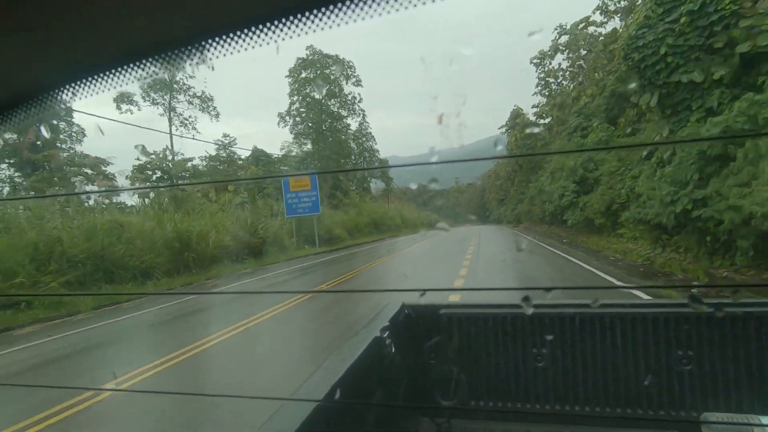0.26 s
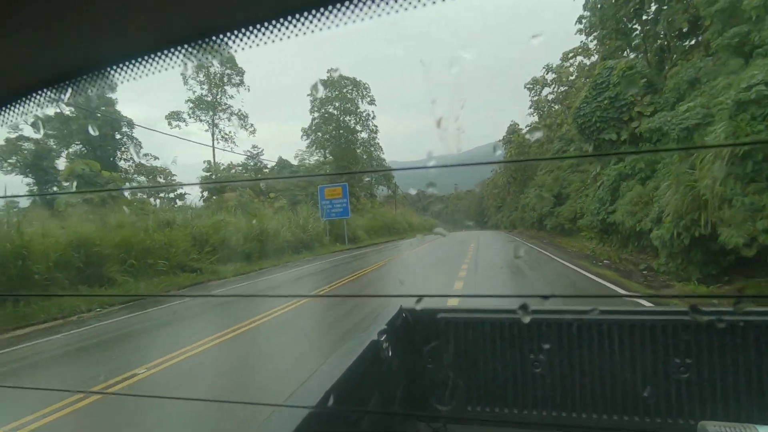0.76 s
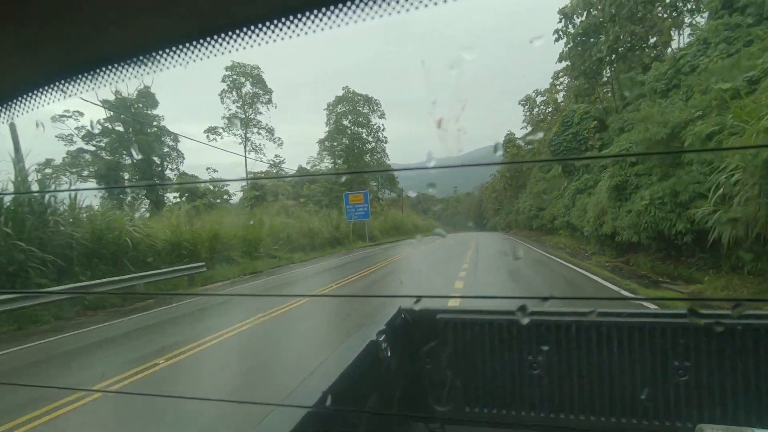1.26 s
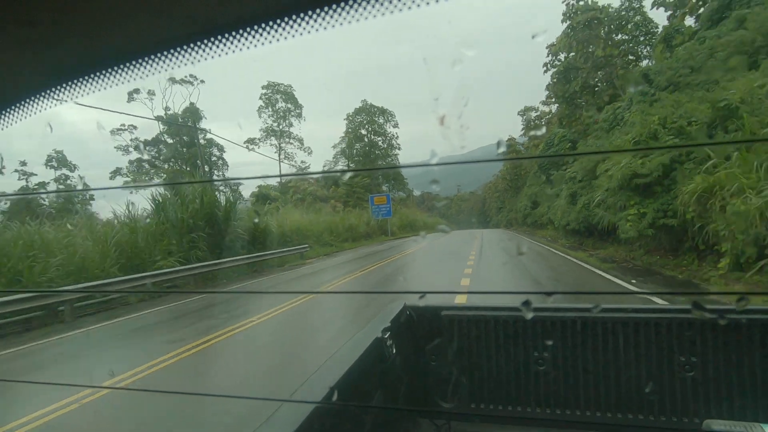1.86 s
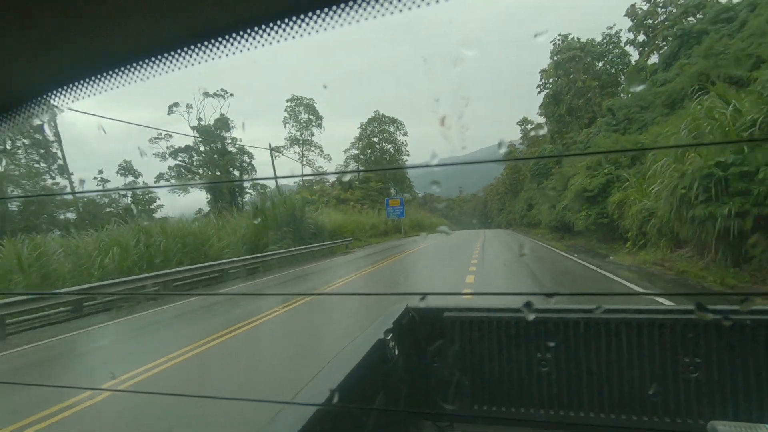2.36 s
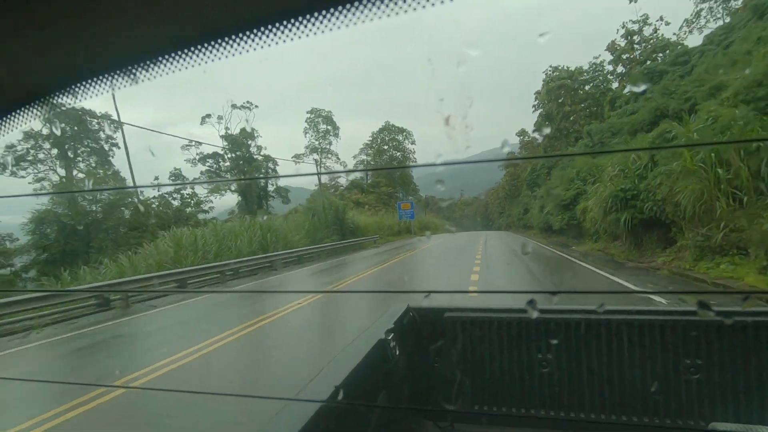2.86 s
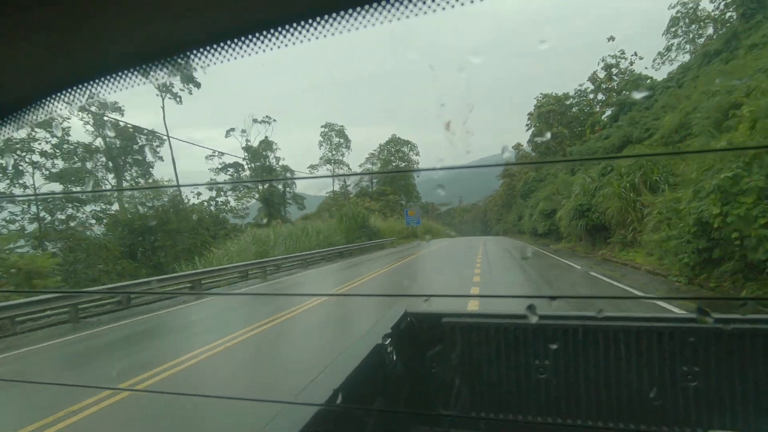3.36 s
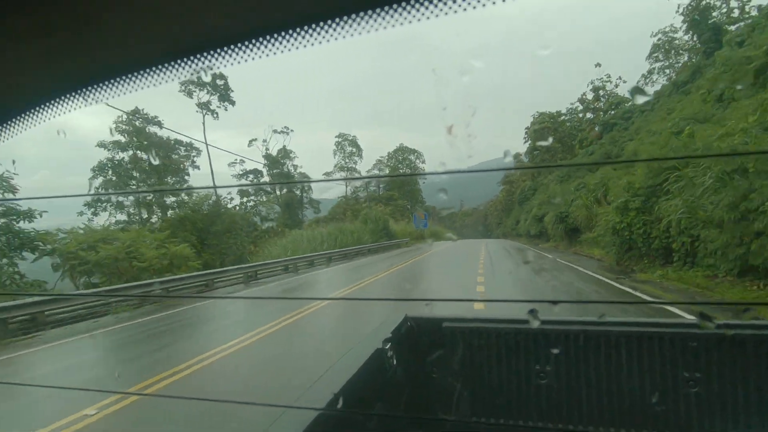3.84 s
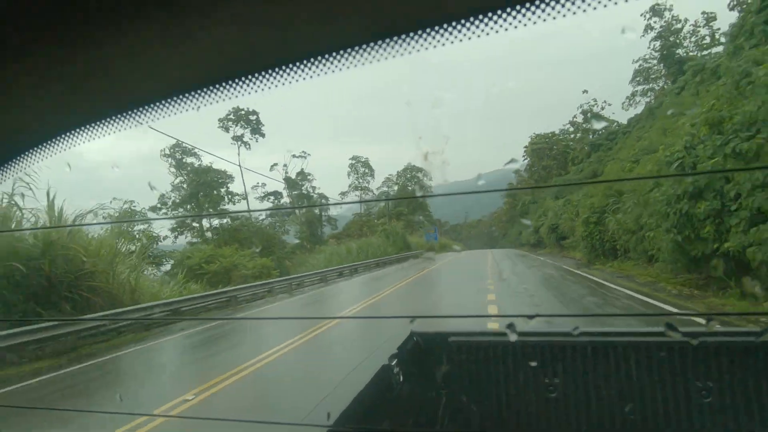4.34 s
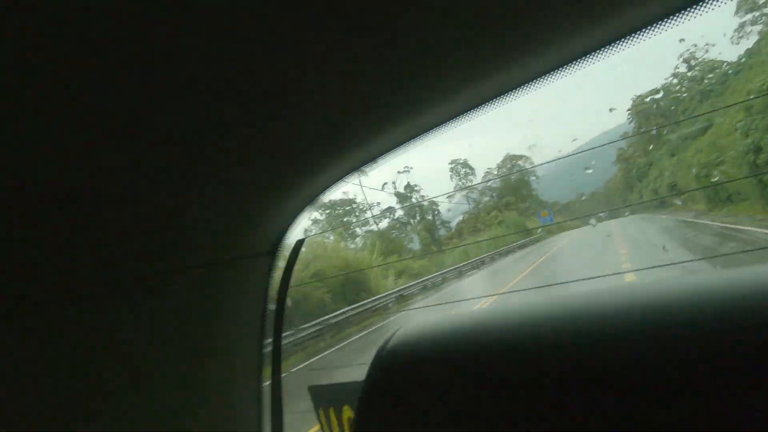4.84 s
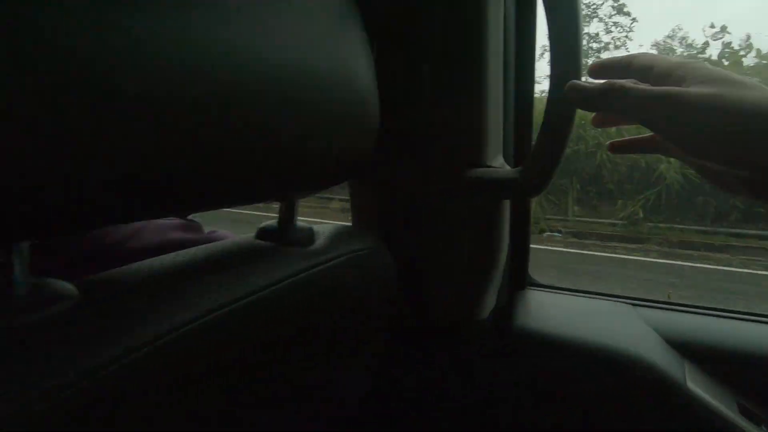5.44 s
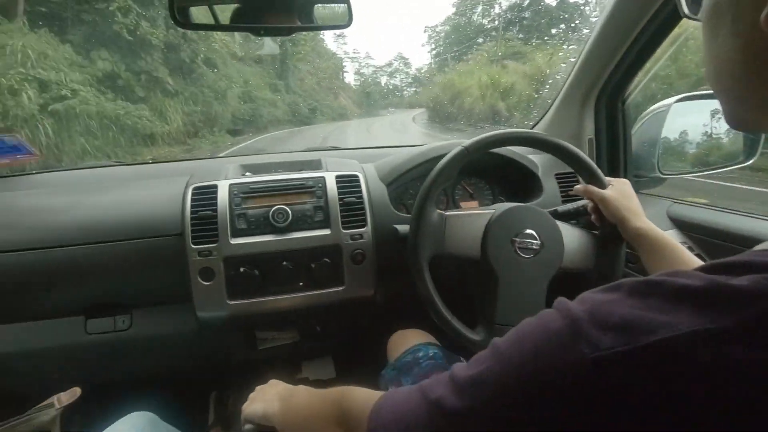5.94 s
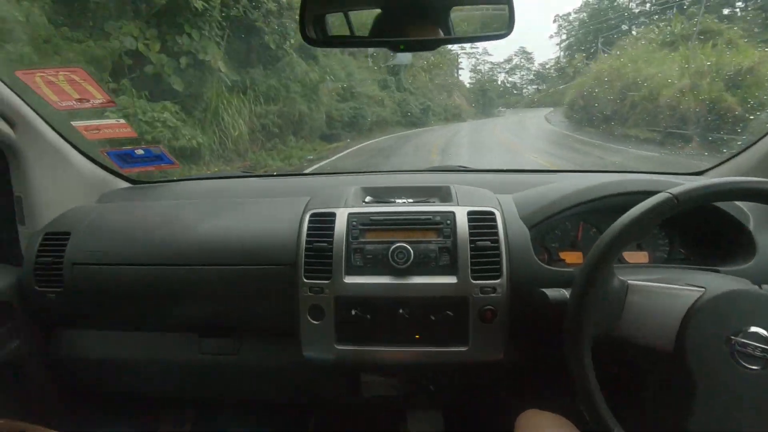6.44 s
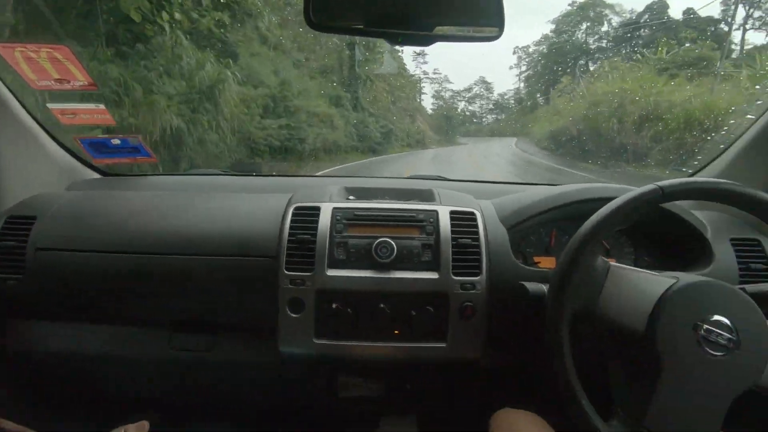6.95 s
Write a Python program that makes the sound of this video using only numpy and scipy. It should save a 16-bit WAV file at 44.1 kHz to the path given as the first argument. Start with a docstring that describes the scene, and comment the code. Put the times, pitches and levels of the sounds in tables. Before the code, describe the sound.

The close interior of a diesel pickup cruising at steady speed on a wet road, recorded from the back seat with handheld stereo microphones. A continuous deep rumble and lumpy engine-and-tyre drone dominate, with muffled clatter and a soft high wash of water. The image starts nearly mono and widens by 1.3 s as a tread hum rises slightly in pitch. Light bumps and ticks occur around 1.5 s with a very faint falling squeak, and again at 2.2 s. Two strong finger knocks land at 2.85 and 2.9 s, another with a tick at 3.5 s; the drone dips and the image narrows, then the drone returns by 4 s. From 5 to 5.5 s the holder turns forward: cloth rustles continue to 6.4 s, the drone becomes deeper and the spray slightly brighter. The image widens again; a finger rub at 6.7 s leads to knocks at 6.8 and a thud at 6.95 s. The driving noise continues to the end at about 7.2 s.

```python
"""In the cab of a pickup cruising on a wet road, heard from the back seat through two hand-held microphones.
Band-shaped noise gives the rumble, drone, roar, wash and spray of road and tyres; a wavering tone, the tread hum.
The four-cylinder diesel is a harmonic series on its cycle rate, with bursts of noise for the combustion clatter.
Near 5 s the holder turns from the rear window to the front. Clothes rustle in clumps of snaps, small parts
tick and squeak, and fingers knock on the casing, ringing its damped modes."""
import sys
import numpy as np
from scipy import signal
from scipy.fft import rfft, irfft
from scipy.io import wavfile
from scipy.ndimage import uniform_filter1d

SR = 44100
rng = np.random.default_rng(int(sys.argv[2]) if len(sys.argv) > 2 else 0)


def master_out(mix):
    """Clip the mix to full scale and print it as 16-bit PCM to the path in sys.argv[1]."""
    frames = np.transpose(np.atleast_2d(mix))
    ceiling = np.clip(frames, -1, 1)
    pcm = np.round(ceiling * 32767).astype(np.int16)
    wavfile.write(sys.argv[1], SR, pcm)


N = 317520
TIME = np.arange(N) / SR
BINS = np.maximum(np.arange(N // 2 + 1) * SR / N, 1)   # f/Hz


def from_db(db):
    """Amplitude ratio: 20 dB is a factor of ten."""
    return 10 ** (np.asarray(db) / 20)


def rms_one(x):
    """Normalisation to unit root-mean-square amplitude."""
    return x / np.sqrt(np.mean(x ** 2) + 1e-20)


def in_time(rows):
    """Linear interpolation of each column of a table over time."""
    s, *columns = np.transpose(rows)
    return [np.interp(TIME, s, c) for c in columns]


def per_bin(points, beyond=None):
    """Interpolation of a table over log frequency, at every bin."""
    hz, value = np.transpose(points)
    return np.interp(np.log(BINS), np.log(hz), value, left=beyond, right=beyond)


def coloured(x, spectrum):
    """Spectral shaping: x is filtered in the frequency domain, then set to rms 1."""
    gain = from_db(per_bin(spectrum, beyond=-np.inf))
    return rms_one(irfft(rfft(x) * gain, N))


def drift(rate):
    """Slow random modulation: joined random knots, 2 * rate of them per second, with rms 1."""
    knots = rng.standard_normal(N // 100)
    position = TIME * 2 * rate + rng.random()
    return rms_one(np.interp(position, np.arange(len(knots)), knots))


def grains(per_s, spread_db):
    """Shot noise: clicks of random sign and uneven size at random instants."""
    sizes = from_db(spread_db * np.minimum(rng.exponential(1, N), 4)) * rng.choice([-1, 1], N)
    return rms_one(sizes * (rng.random(N) < per_s / SR))


def ring(clicks, hz, t60):
    """Damped resonance: a unit click starts a decaying sine, 60 dB down after t60 seconds."""
    r = from_db(-60 / (t60 * SR))
    w = 2 * np.pi * hz / SR
    return signal.lfilter([0, np.sin(w)], [1, -2 * r * np.cos(w), r * r], clicks + 1e-18)


def diffuse(spectrum, grain=0):
    """Diffuse field: two incoherent noises, one common to both ears and one that differs."""
    droplets = [grains(per_s=900, spread_db=4.0) for _ in range(2)]
    return np.array([coloured(rng.standard_normal(N) + grain * drops, spectrum) for drops in droplets])


def evened(x):
    """Automatic levelling: division by the running rms over 0.2 s."""
    return x / np.sqrt(uniform_filter1d(x ** 2, size=SR // 5, axis=1))


TURN_START_S, TURN_LENGTH_S = 4.96, 0.52


def facing():
    """Orientation of the holder: 0 toward the rear window, 1 toward the front."""
    return np.clip((TIME - TURN_START_S) / TURN_LENGTH_S, 0, 1)


# opening of the stereo image: t/s, width (0 mono, 1 full)
IMAGE_WIDTH = [(.35, 0.003), (1.3, 0.86), (2.9, 0.96), (3.75, 0.0076), (5.9, 0), (6.4, 0.6), (6.8, 0.97),
               (7.2, 0.67)]


def image_width():
    """Stereo width: the scale of the difference between the ears."""
    return np.clip(in_time(IMAGE_WIDTH)[0], 0, 1.2)


# unevenness of the road, before trims: t/s, sway of the body level/dB, boom of the cab level/dB
BUMPS = [(0, -28.5, -39), (0.5, -38, -19.5), (1.2, -26, -27), (1.7, -24, -23), (3.0, -27.5, -20),
         (3.3, -31, -31), (3.75, -35, -30), (4.45, -20.5, -21.5), (5.35, -28, -23), (5.7, -21.5, -26),
         (6.35, -25.5, -29.5), (6.9, -25, -28), (7.2, -40, -36.5)]
# drone of tread and engine, before the gains for facing: t/s, level/dB
DRONE_LEVEL = [(0, -23.5), (1.45, -23.5), (1.8, -26), (2.05, -24), (2.5, -26), (2.8, -24), (3.17, -34),
               (3.36, -29.5), (3.68, -33.5), (3.82, -30.5), (4.02, -25), (4.65, -26), (5.0, -31),
               (5.5, -31), (5.95, -30.5), (6.15, -27), (6.4, -28), (6.92, -25.5), (7.1, -32), (7.2, -30)]
# relative spectrum of the rumble through the body: f/Hz, density level/dB per Hz
RUMBLE_SPECTRUM = [(8, -28), (23, -12.5), (32, 2), (50, -1.5), (66, 0), (85, -11), (110, -15.5), (170, -28)]
# relative spectrum of the drone, facing back: f/Hz, density level/dB per Hz
DRONE_BACK_SPECTRUM = [(70, -25), (110, -8), (135, -4.5), (175, -3), (222, -2.5), (245, -10), (270, -10.5),
                       (310, -18.5), (400, -16.5), (470, -23), (620, -29.5), (800, -35), (1100, -48)]
# relative spectrum of the drone, facing front: f/Hz, density level/dB per Hz
DRONE_FRONT_SPECTRUM = [(70, -22), (100, -5.5), (125, 5), (155, -7), (200, -7.5), (255, -18.5), (320, -20),
                        (420, -25), (600, -35.5), (900, -45)]
BOOM_ABOVE_HZ = 46   # the rumble is sway below this and boom above it
PATCH_DB, PATCHES_PER_S = 2.8, 11   # coarse patches of asphalt make the drone lumpy


def road(sway_trim_db=-1.5, boom_trim_db=0.0, back_db=-7.0, front_db=-2.24):
    """Structure-borne noise: bumps sway the body and boom the cab; rough asphalt drones through the tread."""
    sway_db, boom_db = in_time(BUMPS)
    (drone_db,) = in_time(DRONE_LEVEL)
    rumble = diffuse(RUMBLE_SPECTRUM)
    low_pass = signal.butter(4, BOOM_ABOVE_HZ, fs=SR, output="sos")
    sway = signal.sosfiltfilt(low_pass, rumble)
    boom = rumble - sway
    # an equal-power crossfade follows the turn
    turn = facing() * np.pi / 2
    drone_back = from_db(back_db) * np.cos(turn) * diffuse(DRONE_BACK_SPECTRUM)
    drone_front = from_db(front_db) * np.sin(turn) * diffuse(DRONE_FRONT_SPECTRUM)
    drone = (drone_back + drone_front) * from_db(PATCH_DB * drift(PATCHES_PER_S))
    sway = from_db(sway_db + sway_trim_db) * evened(sway)
    boom = from_db(boom_db + boom_trim_db) * evened(boom)
    return sway + boom + from_db(drone_db) * drone


# tyre roar, dropping on smoother asphalt: t/s, level/dB
ROAR_LEVEL = [(0, -54), (1.45, -57.5), (1.8, -56.5), (2.8, -56), (3.17, -63.5), (3.45, -59.5),
              (3.88, -56.5), (4.08, -54.5), (4.6, -57.5), (4.95, -57.5), (5.3, -56), (5.6, -55.5),
              (6.2, -54.5), (6.85, -52.5), (7.15, -54)]
# water thrown up by the tyres, before trims and puddles: t/s, level/dB
WATER_LEVEL = [(0.05, -68.5), (2.64, -70), (3.03, -73), (3.19, -76), (3.45, -70), (4.32, -67), (4.97, -69),
               (5.92, -63.5), (7.15, -65.5)]
# relative spectrum of the roar: f/Hz, density level/dB per Hz
ROAR_SPECTRUM = [(300, -3), (450, -10.5), (560, -9), (700, -9), (900, -12), (1100, -12.5), (1400, -16),
                 (1580, -18), (1800, -17), (2200, -25.5), (3200, -42.5)]
# relative spectrum of the wash from the squeezed film: f/Hz, density level/dB per Hz
WASH_SPECTRUM = [(1200, -23), (2000, 1), (2700, 1), (3600, -1.5), (4400, -14.5), (6000, -10), (7700, -7.5),
                 (9000, -25), (15000, -44)]
# relative spectrum of the flung spray: f/Hz, density level/dB per Hz
SPRAY_SPECTRUM = [(2500, -37.5), (3800, -2.5), (4500, 3.5), (5300, 1), (6500, 4), (7500, -6), (8500, -11),
                  (10000, -22), (15000, -31.5)]
# a deeper film of water lifts the wash
SURGE_S, SURGE_HALF_S, SURGE_DB = 1.48, .14, 3
# wash relative to the water level, and its extra at full image width
WASH_DB, WASH_OPEN_DB = -6.5, 11.5


def wet_tyres(spray_trim_db=-1.5, splash_db=1.0):
    """Broadband flow noise: tyres roar, squeeze out the water film and fling droplets at the wheel arches."""
    water_db = in_time(WATER_LEVEL)[0] + splash_db * drift(16)   # puddles
    roar = from_db(in_time(ROAR_LEVEL)[0]) * diffuse(ROAR_SPECTRUM)
    surge_db = SURGE_DB * np.exp(-((TIME - SURGE_S) / SURGE_HALF_S) ** 2 / 2)
    wash_db = water_db + WASH_DB + surge_db + WASH_OPEN_DB * image_width() ** 2
    wash = from_db(wash_db) * diffuse(WASH_SPECTRUM, grain=0.3)
    spray = from_db(water_db + spray_trim_db) * diffuse(SPRAY_SPECTRUM, grain=0.35)
    return roar + wash + spray


# hum of the tread: t/s, f/Hz, level/dB
TREAD = [(.5, 200, -48), (1.0, 209, -33), (1.45, 218, -29.5), (1.9, 225, -32.5), (2.6, 231, -35),
         (3.1, 231, -48), (3.8, 230, -48), (4.2, 230, -34), (4.8, 230, -40), (5.3, 230, -60)]


def tread_hum(waver=.008, rough=.3):
    """Periodic excitation: the tread blocks hum at a wavering pitch, in quadrature in the two parts."""
    hz, db = in_time(TREAD)
    angle = 2 * np.pi * np.cumsum(hz * (1 + waver * drift(9.3))) / SR
    return from_db(db) * (1 + rough * drift(8)) * np.array([np.sin(angle), np.cos(angle)])


# strokes of sleeves on the seat: t/s, half length/s, level/dB
RUSTLES = [(0.307, 0.008, -68), (0.47, 0.0144, -70), (0.97, 0.024, -66.5), (1.63, 0.012, -73),
           (2.465, 0.0095, -67), (3.367, 0.053, -70.5), (5.109, 0.015, -62.5), (5.333, .02, -67.5),
           (5.587, 0.099, -67.5), (5.835, 0.084, -65), (6.174, 0.062, -64), (6.373, 0.0063, -60)]
# relative spectrum of cloth: f/Hz, density level/dB per Hz
CLOTH_SPECTRUM = [(2500, -17.5), (4500, -0.5), (6500, 8), (8000, 2), (9500, -9), (13000, -50.5),
                  (16000, -14)]


def rustles():
    """Stick-slip friction: cloth slips in clumps of tiny snaps under each stroke."""
    strokes = sum(from_db(db) * np.exp(-((TIME - s) / half) ** 2 / 2) for s, half, db in RUSTLES)
    snaps = grains(per_s=9000, spread_db=2.5) * from_db(2.2 * drift(90))
    return strokes * coloured(snaps, CLOTH_SPECTRUM)


# ticks of trim and clothing, level before trim and decay: t/s, level/dB, upper band edge f/Hz
TICKS = [(0.461, -58, 6500), (0.474, -59, 6500), (1.22, -59, 4500), (1.688, -52, 4200), (1.690, -56, 6500),
         (1.812, -56, 4070), (2.313, -54, 3700), (2.73, -59, 6500), (2.803, -56, 3800), (3.504, -44, 1950),
         (3.504, -57, 7000), (6.707, -52, 5800), (7.182, -51, 6500)]


def ticks(decay_s=0.004, trim_db=-0.5, low_share=0.5):
    """Impulsive noise: each tick is a decaying burst, one octave wide below its upper band edge."""
    out = np.zeros(N)
    age = TIME[:SR // 20]
    bursts = rng.standard_normal((len(TICKS), len(age)))
    for (s, db, hz), burst in zip(TICKS, bursts):
        low_hz = hz * np.clip(low_share, .1, .8)
        band = signal.butter(2, [low_hz, hz], "band", fs=SR, output="sos")
        crack = rms_one(signal.sosfilt(band, burst)) * np.exp(-age / decay_s)
        at = int(s * SR)
        out[at:at + len(age)] += from_db(db + trim_db) * crack[:N - at]
    return out


# a faint falling squeak: t/s, f/Hz, level/dB
SQUEAK = [(1.51, 2900, -72), (1.545, 2400, -64), (1.58, 2100, -65), (1.62, 2000, -70)]


def squeak(waver=.05):
    """Frequency modulation: random modulation roughens a faint sine that falls in pitch."""
    hz, db = in_time(SQUEAK)
    sounding = (TIME >= SQUEAK[0][0]) & (TIME <= SQUEAK[-1][0])
    angle = 2 * np.pi * np.cumsum(hz * (1 + waver * drift(200))) / SR
    return sounding * from_db(db) * np.sin(angle)


# fingers on the casing, impulses before filtering: t/s, tap level/dB, thud level/dB
KNOCKS = [(1.458, -26, -13), (1.506, -35, -17), (2.231, -30, -12), (2.255, -37, -15), (2.8538, 0.3, -11),
          (2.9129, -2.2, -12), (3.5043, -13, -24), (6.8106, -9.5, -20), (6.814, -27, -11),
          (6.9511, -18, -5.5)]
# modes of the rocking casing, before the fingertip low-pass: f/Hz, level/dB, decay time t60/s
CASING_MODES = [(140, -7, .022), (1150, 7.5, .0047), (1247, 2.7, .01), (2000, -30, .015)]
# a finger slides over the casing: start t/s, end t/s, level/dB of the slips
RUBS = [(6.695, 6.81, -38), (6.81, 6.835, -35)]
SLIPS_PER_S = 1800
# the flesh lands with a thud just after the tap
THUD_HZ, THUD_T60_S, THUD_DELAY_S = 215, .018, .002


def knocks(lag_s=.000065, shell_db=4, shell_hz=250, shell_t60=.0019):
    """Modal excitation: taps swing the two microphones oppositely and click the shell; the right one thuds."""
    taps, thuds = np.zeros(N), np.zeros(N)
    slips = rng.standard_normal(N) * (rng.random(N) < SLIPS_PER_S / SR)   # skin sticks and slips
    for start, end, db in RUBS:
        taps += from_db(db) * slips * (TIME >= start) * (TIME < end)
    for s, tap_db, thud_db in KNOCKS:
        taps[int(s * SR)] = from_db(tap_db)
        thuds[int((s + THUD_DELAY_S) * SR)] = from_db(thud_db)
    fingertip = signal.butter(3, 980, fs=SR, output="sos")
    nail = signal.butter(3, 1250, fs=SR, output="sos")
    # successive modes alternate in sign
    modes = sum((-1) ** k * from_db(db) * ring(taps, hz, t60)
                for k, (hz, db, t60) in enumerate(CASING_MODES))
    rock = signal.sosfilt(fingertip, modes)
    thud = signal.sosfilt(fingertip, ring(thuds, THUD_HZ, THUD_T60_S))
    shell = from_db(shell_db) * signal.sosfilt(nail, ring(taps, shell_hz, shell_t60))
    left = np.interp(TIME - lag_s, TIME, rock)
    right = -rock - thud
    return np.array([left, right]) + shell


# relative strength of each cylinder in firing order: level/dB
CYLINDERS_DB = [-1, -6.5, 0.5, -11.5]
FIRING_DECAY_S = 0.0048
# relative spectrum of combustion clatter: f/Hz, density level/dB per Hz
CLATTER_SPECTRUM = [(300, 0), (520, 4), (1000, -13), (1900, -19.5), (2500, -31.5)]


def clatter(cycles, speed, clatter_db=-56):
    """Amplitude-modulated noise: four firings a cycle, each a decaying burst dulled by the bulkhead."""
    firings = cycles * len(CYLINDERS_DB)
    age_s = firings % 1 / (speed * len(CYLINDERS_DB))
    cylinder = firings.astype(int) % len(CYLINDERS_DB)
    bursts = from_db(CYLINDERS_DB)[cylinder] * np.exp(-age_s / FIRING_DECAY_S)
    noises = rng.standard_normal((2, N))
    return from_db(clatter_db) * np.array([coloured(bursts * noise, CLATTER_SPECTRUM) for noise in noises])


def drone_swing_db():
    """Level fluctuation: the drone level relative to its mean in dB."""
    (db,) = in_time(DRONE_LEVEL)
    return db - db.mean()


# engine speed: t/s, four-stroke cycle rate f/Hz
ENGINE_SPEED = [(0, 22.94), (.4, 23.11), (1.05, 23.58), (1.8, 23.12), (3.2, 23.0), (3.6, 23.2),
                (4.4, 23.05), (5.1, 23.26), (6.3, 23.1), (7.2, 22.68)]
# harmonics before the engine gain: multiple of the cycle rate, facing back level/dB, facing front level/dB
ORDERS_DB = [(3, -33, -43), (4, -29, -28), (5, -41, -35), (6, -38, -50), (7, -29.3, -36), (8, -33, -38),
             (9, -40, -42), (10, -42, -50), (11, -36, -42), (12, -38.5, -49), (13, -45.5, -53),
             (14, -42.5, -50), (15, -53, -54), (16, -49.5, -55), (17, -60, -56), (18, -56, -62),
             (19, -68, -54), (20, -60, -68), (21, -60, -68), (22, -51.5, -53.5), (24, -57.5, -66),
             (25, -58.5, -68), (26, -63, -74), (28, -66, -72), (31, -68, -72), (33, -70, -78),
             (34, -71, -78), (35, -69, -80), (39, -72, -80), (40, -66, -80), (41, -71, -78), (45, -68, -80),
             (46, -74, -80), (48, -69.5, -63.5), (49, -78, -74), (52, -75, -85), (56, -77, -72.5),
             (61, -75, -85), (62, -78, -85), (65, -74, -82)]
# gain on the whine, the upper harmonics: t/s, level/dB
WHINE_LEVEL = [(0, -4.5), (1.0, -2), (1.5, 1), (2.8, -1), (3.5, -4), (5.1, -6), (5.65, 2.5), (6.2, -1.5),
               (6.7, -2), (7.2, -3)]
WHINE_FROM_ORDER = 16
# the engine swells with the drone: gain at its mean, share of its swing, change when facing front
ENGINE_DB, ENGINE_FOLLOWS, ENGINE_FRONT_DB = -1.3, .9, 3.0


def engine(rough=.33, unsteady=.0012, flutter_db=2.4):
    """Harmonic series: uneven firings shake the orders; the cab's standing waves change with the turn."""
    (speed,), (whine_db,), front = in_time(ENGINE_SPEED), in_time(WHINE_LEVEL), facing()
    cycles = np.cumsum(speed * (1 + unsteady * drift(8))) / SR
    out = clatter(cycles, speed)
    gain = from_db(ENGINE_DB + ENGINE_FOLLOWS * drone_swing_db() + ENGINE_FRONT_DB * front)
    for order, back_db, front_db in ORDERS_DB:
        # short waves come and go more as the hand sways through them
        sway_db = flutter_db * order / ORDERS_DB[-1][0] * drift(2.4)
        order_db = back_db + front * (front_db - back_db) + sway_db
        order_db = order_db + whine_db * (order >= WHINE_FROM_ORDER)
        level = from_db(order_db) * (1 + rough * drift(11))
        angle = 2 * np.pi * (order * cycles + rng.random())
        out += level * np.array([np.sin(angle), np.cos(angle)])
    return gain * out


# part that differs between the ears, at full width: f/Hz, level/dB
SPREAD = [(30, -8), (70, -7.5), (105, -9.5), (170, -21.5), (300, -17.5), (520, -10.5), (900, 4.5),
          (1600, 0), (2800, 0.5), (4700, -3.5), (8200, 3.5)]
# left minus right, at full width: f/Hz, level difference/dB
LEAN = [(30, -8), (65, -6), (105, -2.5), (200, -3), (420, -5.5), (750, -7), (1100, 2.5), (3000, -1),
        (4000, -3.5), (6000, -1.5), (7800, 3)]
# facing front, the bass below this is narrower
NARROW_BELOW_HZ, NARROW_FRONT_DB = 140, -13.5


def at_the_ears(common, differing):
    """Interaural coherence: bass nearly alike and leaning right, treble diffuse, in a variable width."""
    soft_ends = signal.windows.tukey(N, .004)
    # a level difference as a ratio of half-difference to half-sum
    lean = np.tanh(per_bin(LEAN) * np.log(10) / 20 / 2)
    spread_part = rfft(differing * soft_ends) * from_db(per_bin(SPREAD))
    lean_part = rfft(common * soft_ends) * lean
    side = irfft(spread_part + lean_part, N)
    low_pass = signal.butter(2, NARROW_BELOW_HZ, fs=SR, output="sos")
    bass = signal.sosfiltfilt(low_pass, side)
    side = side - bass + from_db(NARROW_FRONT_DB * facing()) * bass
    return common + image_width() * side * np.array([[1], [-1]])


def scene():
    """Superposition: the steady noise of the truck, the small sounds of the cab and the knocks."""
    common, differing = road() + wet_tyres() + tread_hum() + engine()
    small_sounds = rustles() + ticks() + squeak()
    return at_the_ears(common + small_sounds, differing) + knocks()


def record(dry):
    """Band limitation: a steep low-pass removes the top above 15.7 kHz."""
    return signal.sosfilt(signal.cheby2(12, 70, 15700, fs=SR, output="sos"), dry)


dry = scene()
out = record(dry)
master_out(out)
```